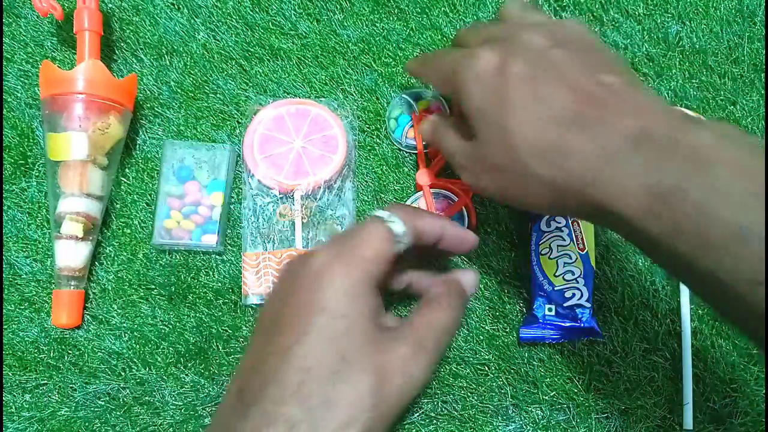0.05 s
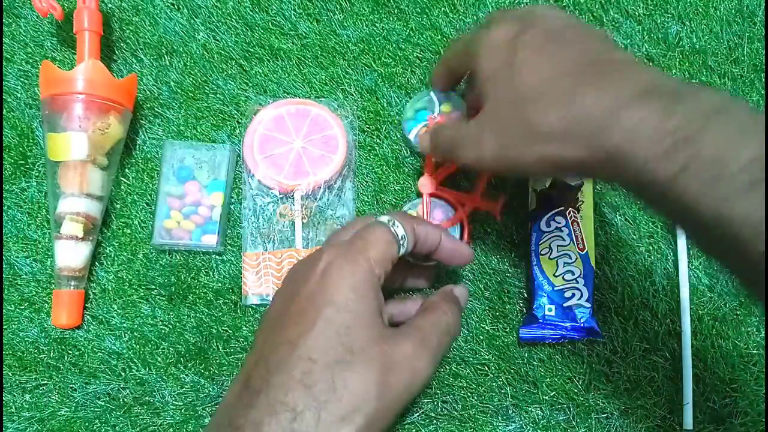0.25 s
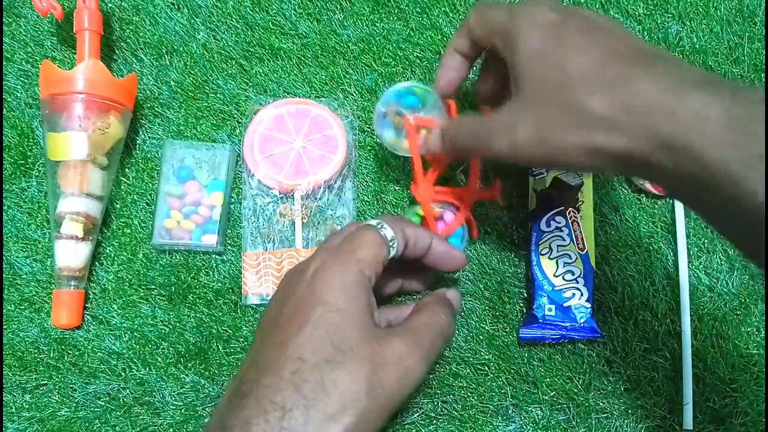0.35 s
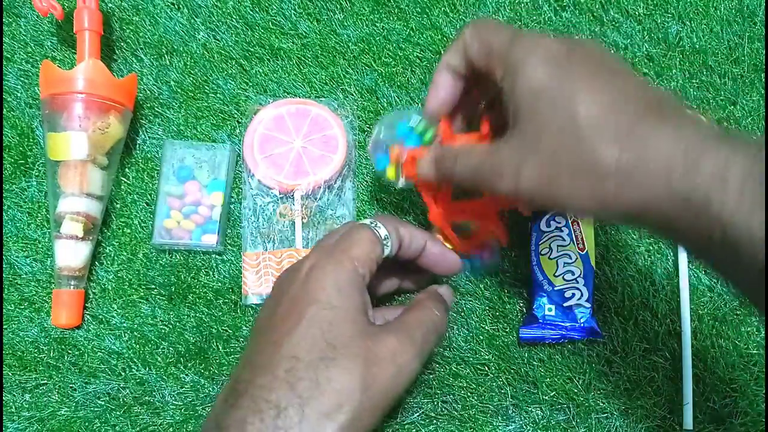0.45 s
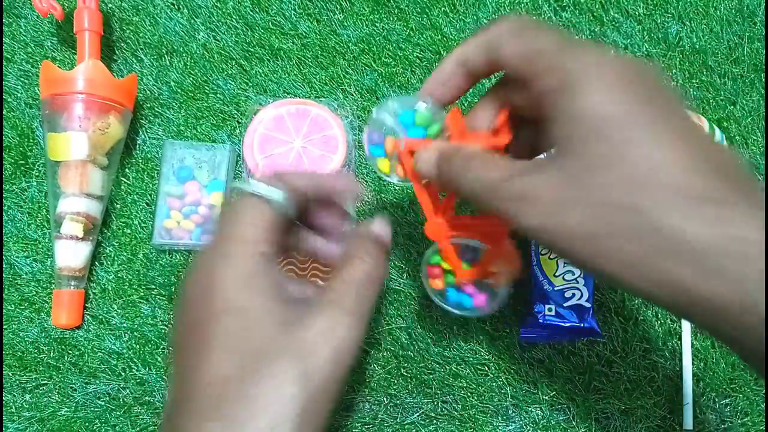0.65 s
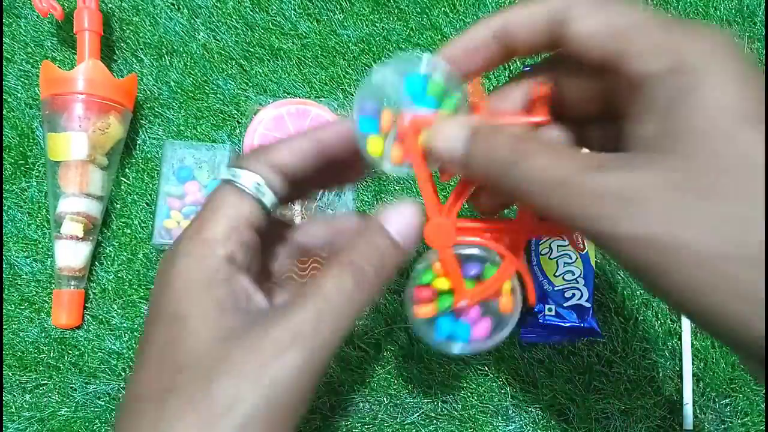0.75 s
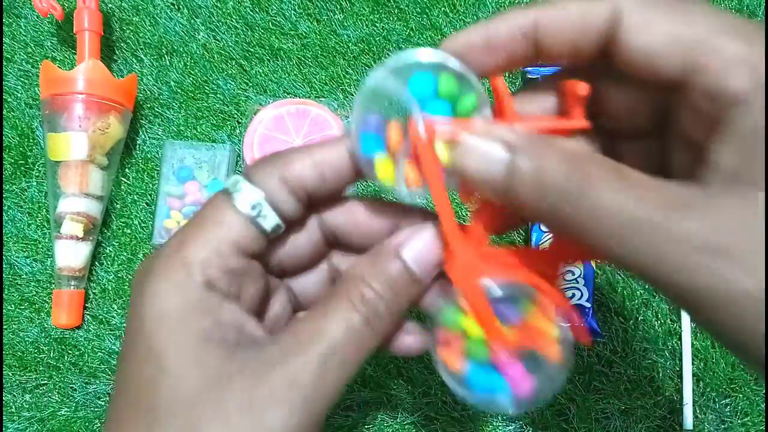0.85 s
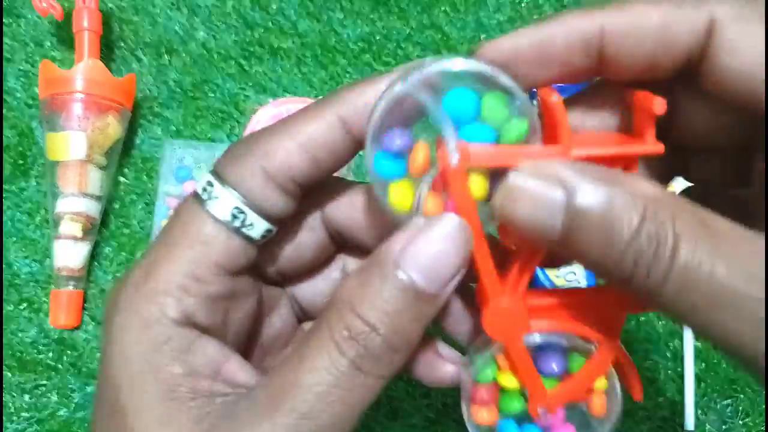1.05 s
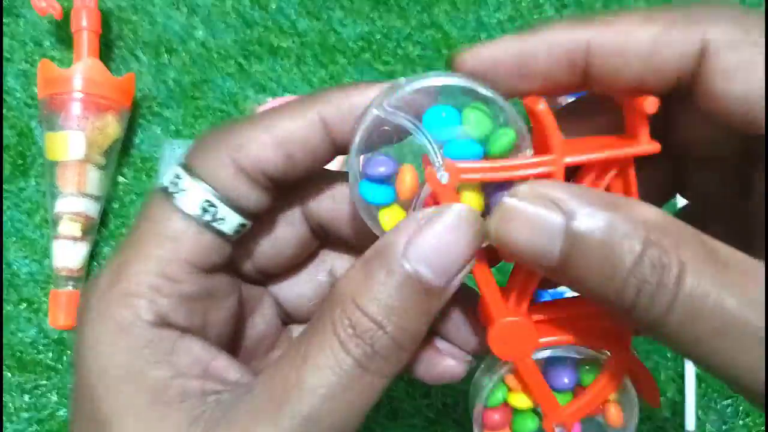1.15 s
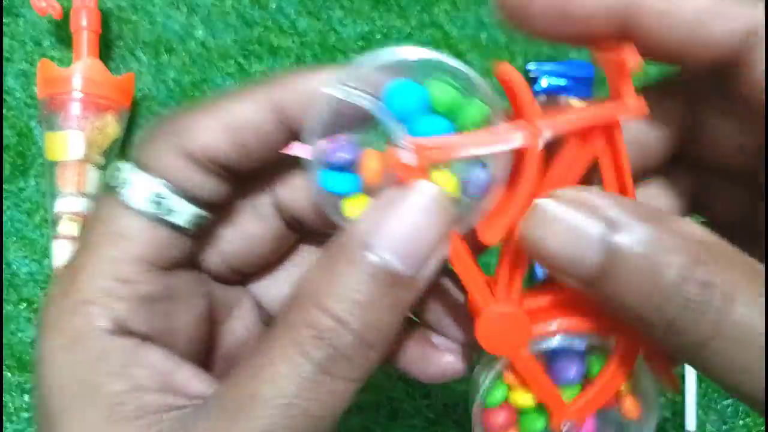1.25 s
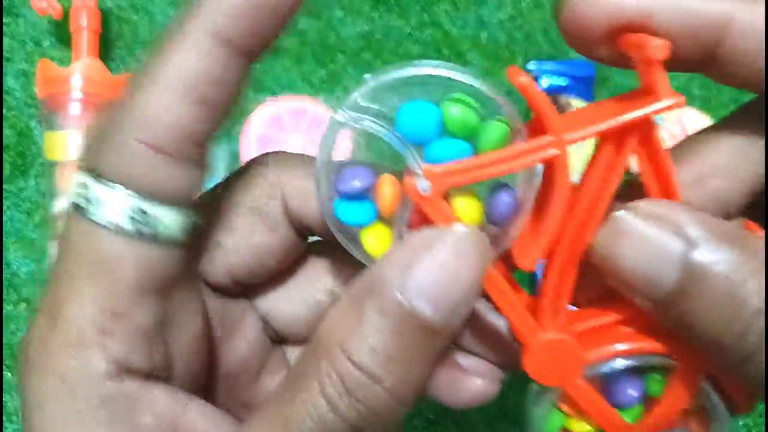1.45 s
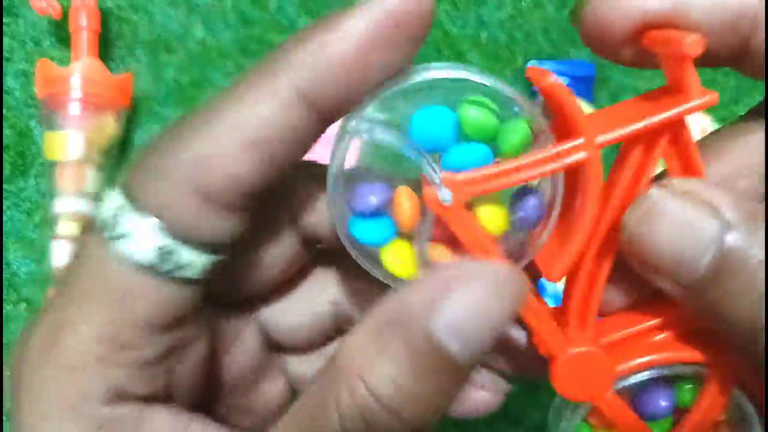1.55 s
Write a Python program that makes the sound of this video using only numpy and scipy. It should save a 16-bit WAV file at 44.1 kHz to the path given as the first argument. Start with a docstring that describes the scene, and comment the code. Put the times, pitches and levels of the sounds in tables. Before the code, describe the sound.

Hard candies rattle briefly inside a plastic toy bicycle's wheels at about 0.2 seconds. A soft bump and a louder tumble come around 0.5 seconds, the candies settling in bright ticks by 0.7. The plastic then clicks under rubbing fingers, most densely from 0.9 to 1.3 seconds, with two faint ticks near the end. A faint hum runs underneath in a small room.

```python
"""Candies in a toy bicycle.

A plastic toy bicycle with hard candies in its two hollow wheels is lifted off a mat and turned in the
hands. The candies tumble twice and settle one by one, each impact a crack with a ringing ping; then the
frame and wheels click under the rubbing fingers. A small room answers each click, over a faint hum."""
import sys
import numpy as np
from scipy import signal
from scipy.fft import rfft, irfft
from scipy.io import wavfile
from scipy.ndimage import uniform_filter1d

SR = 44100
rng = np.random.default_rng(int(sys.argv[2]) if len(sys.argv) > 2 else 0)


def pcm_store(signal):
    """Save signal as 16-bit PCM."""
    levels = np.round(np.clip(np.atleast_2d(signal), -1, 1) * 32767)
    wavfile.write(sys.argv[1], SR, levels.astype(np.int16).T)


N = 70560
T = np.arange(N) / SR
LN_1000 = np.log(1000)  # time constants in a decay of 60 dB
CANDY_RANGE_HZ, PING_T60_S = (6700, 8460), 0.016  # large candies ping low, small ones high


def from_db(db):
    """Amplitude grows tenfold with every 20 dB."""
    return 10 ** (np.asarray(db) / 20)


def rms_one(x):
    """Normalisation to unit rms."""
    return x / np.sqrt(np.mean(x ** 2) + 1e-20)


def decay(start, tau):
    """Damping: a jump to 1, then an exponential fall with time constant tau."""
    return (T >= start) * np.exp(-np.clip((T - start) / tau, 0, 60))


def strike(start, tau, rise_s=0.0011):
    """Impact envelope: the contact builds up quickly, then dies away."""
    return decay(start, tau) * (1 - decay(start, rise_s))


def grit():
    """White noise of constant magnitude and random sign."""
    return rng.choice([-1., 1.], N)


def drift(per_s):
    """Smoothed noise: a slow random wander of unit rms."""
    width = int(SR / per_s)
    smoothed = uniform_filter1d(rng.standard_normal(N), width, mode="wrap")
    return rms_one(uniform_filter1d(smoothed, width, mode="wrap"))


def convolve(x, response):
    """A linear system convolves its input with its impulse response."""
    return signal.fftconvolve(x, response)[:N]


def colour(x, spectrum, tilt_db=0, size=2048):
    """Minimum-phase filtering at unit power gain, tilted by tilt_db per octave above 1 kHz."""
    octave = np.log2(np.maximum(np.arange(size // 2 + 1) * SR / size, 1))
    hz, db = np.transpose(spectrum)
    shape_db = np.interp(octave, np.log2(hz), db) + tilt_db * np.maximum(octave - np.log2(1000), 0)
    cepstrum = irfft(np.log(from_db(shape_db)))
    cepstrum[1:size // 2] *= 2  # folding the cepstrum makes the filter causal
    cepstrum[size // 2 + 1:] = 0
    response = irfft(np.exp(rfft(cepstrum)))
    return convolve(x, response / np.linalg.norm(response))


def background(waver_db=7, floor_db=-72):
    """Superposition of room noise, a hum modulated in level and phase, and low tones that swell and fade."""
    # Each row: frequency in Hz, median level in dB.
    hum_partials = [(66, -73), (100, -71.5), (130, -73.5)]
    # Each row: centre in seconds, half width in seconds, frequency in Hz, peak level in dB.
    low_tones = [(.38, .08, 567, -64), (.5, 0.1, 130, -52), (0.599, 0.061, 405.7, -60),
                 (.65, 0.025, 72, -49.5), (1.201, 0.096, 69.2, -60), (1.297, 0.023, 522, -53)]
    # Each row: frequency in Hz, relative level of the room noise in dB.
    floor_spectrum = [(25, -35), (100, 0.5), (200, -11.5), (520, -4.5), (900, -19.5), (2000, -26),
                      (15000, -33.5)]
    hum = sum(from_db(db + waver_db * drift(27)) * np.sin(2 * np.pi * hz * T + drift(45))
              for hz, db in hum_partials)
    tones = sum(from_db(db) * np.exp(-((T - centre) / width) ** 2) * np.sin(2 * np.pi * hz * T)
                for centre, width, hz, db in low_tones)
    return hum + tones + from_db(floor_db) * colour(rng.standard_normal(N), floor_spectrum, size=8192)


def handling(bump_octaves=1.2):
    """Friction of fingers gives low noise; damped bumps on mat and hand sit higher the harder they are."""
    # Each row: time in seconds, level of the rubbing in dB.
    rub_levels = [(0, -72.5), (.19, -71.5), (.27, -55), (.48, -56.5), (.65, -55), (.74, -66.5), (.9, -67.5),
                  (1.0, -54), (1.28, -61.5), (1.36, -72)]
    # Each row: frequency in Hz, relative level in dB.
    rub_spectrum = [(30, -28), (66, 0.5), (130, 4.5), (230, -5), (520, -8.5), (800, -19), (6000, -27.5)]
    # Each row: start in seconds, peak level in dB, centre frequency in Hz.
    bumps = [(0.376, -47, 220), (0.4527, -39, 270), (.4531, -31, 900)]
    rub_envelope = from_db(np.interp(T, *np.transpose(rub_levels)))
    out = rub_envelope * colour(rng.standard_normal(N), rub_spectrum, size=8192)
    for start, db, hz in bumps:
        edges_hz = hz * 2 ** (np.array([-.5, .5]) * bump_octaves)
        band = signal.butter(3, edges_hz, "band", fs=SR, output="sos")
        push = signal.sosfilt(band, signal.unit_impulse(N, int(start * SR)) + 1e-18)
        out += from_db(db) * push / np.abs(push).max()
    return out


def contacts(per_s, spread_db, decay_s=0.0012):
    """Shot noise: tiny random impacts of uneven size add in power; unit rms."""
    sizes = (rng.random(N) < per_s / SR) * from_db(spread_db * np.minimum(rng.exponential(1, N), 3))
    power = signal.lfilter([1], [1, -np.exp(-2 / (decay_s * SR))], sizes ** 2 + 1e-18)
    return rms_one(np.sqrt(power) * grit())


def chatter(pings_per_s=2100, sizes=10):
    """Free vibration: randomly knocked candies each ping at the natural frequency of their size."""
    out = 0
    for hz in np.linspace(*CANDY_RANGE_HZ, sizes):
        knocks = (rng.random(N) < pings_per_s / sizes / SR) * rng.random(N)
        ping = strike(0, PING_T60_S / LN_1000) * np.sin(2 * np.pi * hz * T)
        out += convolve(knocks, ping)
    return rms_one(out)


def wheel_ring(cracks, gain_db=-18):
    """Resonance: impacts excite the damped modes of the hollow wheel."""
    # Each row: frequency in Hz, relative level in dB, time to fall 60 dB in seconds.
    modes = [(2380, -34, 0.11), (8030, -32.5, .05)]
    response = sum(from_db(db + gain_db) * decay(0, t60 / LN_1000) * np.sin(2 * np.pi * hz * T)
                   for hz, db, t60 in modes)
    return convolve(cracks, response)


def candies(hit_gain_db=5.5, crack_s=0.0015, neighbour_db=-13):
    """Impact excitation: candy hits, slides and one finger rub crack and ping; the wheel rings along."""
    # A candy strikes its neighbours or the wheel. Each row: start in seconds, relative level in dB,
    # ping frequency in Hz, ping level against the crack in dB.
    hits = [(0.2134, -33, 7140, 2), (0.2225, -28, 2360, -7.5), (0.2283, -22.5, 5200, -9),
            (0.243, -29, 7120, 12), (0.2514, -30.5, 7670, 11.5), (0.4262, -27, 8370, -3.5),
            (0.43, -35, 6950, 6.5), (0.4749, -20.5, 7900, -5), (0.4864, -9, 8130, -14),
            (.4882, -16, 7500, -24), (0.4921, -10, 7340, -27), (0.496, -13.5, 8340, -7),
            (0.5047, -21, 8180, 4), (.511, -23, 7290, -6), (0.5172, -21, 7930, 8), (0.52, -30, 8200, 10.5),
            (0.5228, -17.5, 7140, -3.5), (0.5303, -22, 6740, 7), (0.5431, -28.5, 7000, 2),
            (.555, -25, 7070, 9), (0.5729, -24.5, 7200, 7.5), (0.58, -26, 6960, 8), (0.5901, -16, 7680, -2),
            (0.5908, -22.5, 6890, 11), (0.6038, -34, 8200, 1), (0.6209, -27, 2870, -6),
            (0.6326, -24, 2580, -9.5), (0.6487, -29.5, 7520, -0.5), (0.6639, -28.5, 2900, -21)]
    # Candies slide in a wheel; the last row is a short finger rub on the plastic frame.
    # Each row: start, rise, hold and release in seconds, level in dB, treble tilt in dB per octave,
    # ping level against the cracks in dB.
    slides = [(0.2092, 0.015, 0.022, 0.022, -27, -1.5, -14.5),
              (0.438, 0.037, 0.043, 0.029, -36.5, -4.5, -15), (0.48, 0.0039, 0.012, 0.029, -17, 3.5, -9.5),
              (0.537, 0.014, 0.077, 0.027, -41, -1.5, -10.5), (0.931, 0.013, 0.188, 0.01, -52.5, -2, -18),
              (1.275, .006, 0.017, 0.0084, -55, -2.5, -22)]
    # Each row: frequency in Hz, relative level of a crack in the wheel in dB.
    wheel_spectrum = [(600, -29), (1300, -24.5), (2400, -11.5), (3600, -9), (5200, -3), (6300, -6.5),
                      (7100, 1.5), (8400, -3.5), (10000, -8.5), (12700, -14), (15200, -6)]
    force, pings = 0, 0
    neighbours = rng.uniform(*CANDY_RANGE_HZ, (len(hits), 2))  # each candy sets two others ringing
    for (start, db, hz, ping_db), neighbour_hz in zip(hits, neighbours):
        level = from_db(db + hit_gain_db)
        force += level * strike(start, crack_s) * grit()
        turn = 2 * np.pi * (T - start)
        ring = np.sin(hz * turn) + from_db(neighbour_db) * sum(np.sin(f * turn) for f in neighbour_hz)
        pings += level * from_db(ping_db) * strike(start, PING_T60_S / LN_1000) * ring
    cracks = colour(force, wheel_spectrum)
    random_pings = chatter()
    for start, rise, hold, release, db, tilt_db, ping_db in slides:
        onset = np.clip((T - start) / rise, 0, 1)
        fade = np.exp(-np.maximum(T - start - rise - hold, 0) / release)
        envelope = from_db(db) * onset * fade
        cracks += colour(envelope * contacts(per_s=1400, spread_db=4), wheel_spectrum, tilt_db)
        pings += from_db(ping_db) * envelope * random_pings
    return cracks + pings + wheel_ring(cracks)


def accent(x, hz, q=5, gain_db=4):
    """Local resonance: the struck spot favours one broad band; the power stays the same."""
    b, a = signal.iirpeak(hz, q, fs=SR)
    out = x + from_db(gain_db) * signal.lfilter(b, a, x)
    return out * np.std(x) / np.std(out)


def frame_clicks(decay_s=0.0028, slip_db=-4.5):
    """Stick-slip friction: each click of plastic under the fingers is a crack with a run of tiny slips."""
    # Each row: start in seconds, level in dB, treble tilt in dB per octave, resonance in Hz.
    clicks = [(0.4019, -34, -8, 5770), (0.407, -26.5, -1, 4960), (0.7388, -46.5, -2.5, 5530),
              (0.765, -49.5, -1.5, 5900), (.843, -46, -1.5, 5570), (0.851, -45, -2.5, 7330),
              (0.9272, -42, -3, 7700), (0.9455, -31.5, -0.5, 7870), (.951, -30.5, 2.5, 7840),
              (.964, -30.5, -2, 7740), (0.9682, -25.5, -.5, 13400), (0.9857, -27.5, -1, 7100),
              (0.9985, -25, -0.5, 5160), (1.0015, -26, 6, 7900), (1.015, -31.5, 2, 7940),
              (1.0568, -20, 3, 5660), (1.0622, -29.5, -5.5, 7600), (1.0848, -26, -1, 5260),
              (1.1028, -22, 0, 5340), (1.108, -35.5, -10, 5200), (1.1226, -28, -0.5, 7100),
              (1.2405, -34.5, -3, 7440), (1.2601, -25.5, -2, 6240), (1.4133, -57.5, -1.5, 8150),
              (1.487, -58, 0, 8020)]
    # Each row: frequency in Hz, relative level in dB.
    frame_spectrum = [(900, -25.5), (1400, -20), (2800, -10), (3900, -9.5), (5300, -5), (7900, -2.5),
                      (10000, -9), (12700, -13.5), (15200, -8)]
    out = 0
    for start, db, tilt_db, hz in clicks:
        roughness = grit() + from_db(slip_db) * contacts(per_s=1800, spread_db=0.5)
        force = strike(start, decay_s) * roughness
        out += from_db(db) * accent(colour(force, frame_spectrum, tilt_db), hz)
    return out


def room(x, early_delay_s=0.0024, early_t60_s=0.066, early_db=-8, tail_delay_s=0.008):
    """Reverberation: early reflections off hands and table, then a diffuse tail, longest in the treble."""
    # Each row: upper band edge in Hz, level before band filtering in dB, reverberation time in seconds.
    tail_bands = [(3700, -8, 0.2), (8600, -11, 0.23), (16980, -21, 0.59)]
    early = rng.standard_normal(N) * decay(early_delay_s, early_t60_s / LN_1000)
    response = from_db(early_db) * early / np.linalg.norm(early)
    low_hz = 100
    for high_hz, db, t60 in tail_bands:
        tail = grit() * decay(tail_delay_s, t60 / LN_1000)
        band = signal.butter(2, [low_hz, high_hz], "band", fs=SR, output="sos")
        response += from_db(db) * signal.sosfilt(band, tail / np.linalg.norm(tail))
        low_hz = high_hz
    return convolve(x, response)


def scene(click_send_db=-0.5):
    """Direct and reverberant sound add; the frame's clicks are slightly drier than the rattle."""
    rattle = candies() + handling()
    clicks = frame_clicks()
    reverberation = room(rattle + from_db(click_send_db) * clicks)
    return (rattle + clicks + reverberation + background())[None]


def record(dry):
    """Band limiting: a steep low-pass filter cuts the treble above 15.6 kHz."""
    return signal.sosfilt(signal.ellip(10, .2, 75, 15600, fs=SR, output="sos"), dry)


dry = scene()
out = record(dry)
pcm_store(out)
```